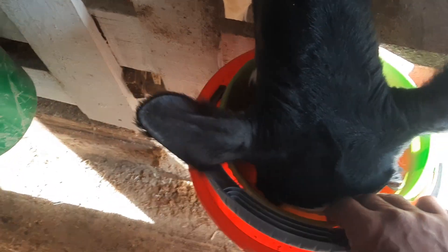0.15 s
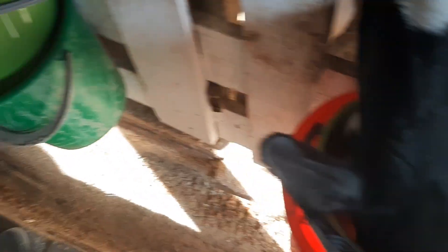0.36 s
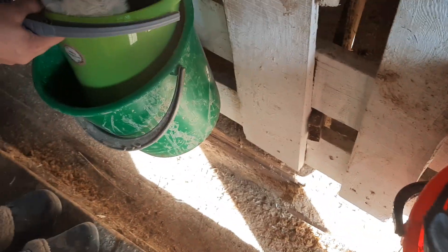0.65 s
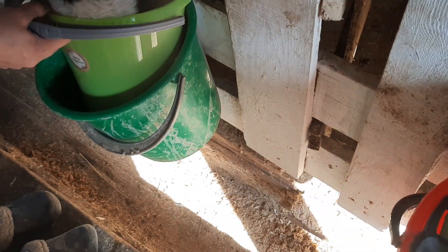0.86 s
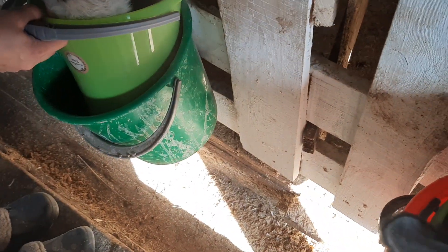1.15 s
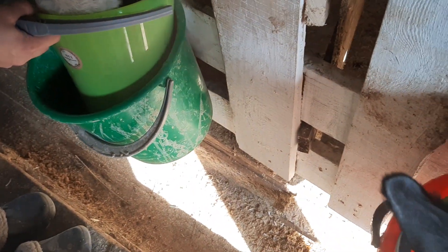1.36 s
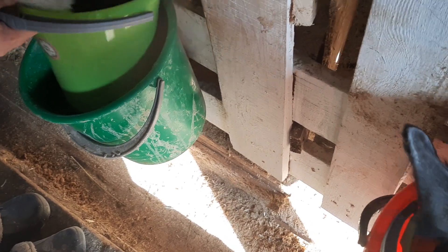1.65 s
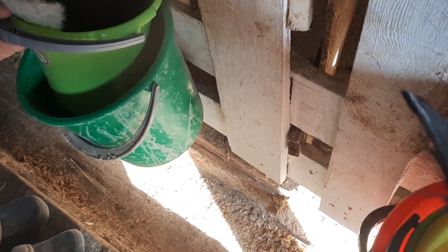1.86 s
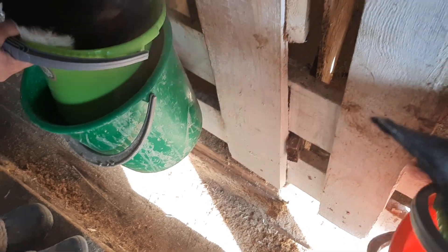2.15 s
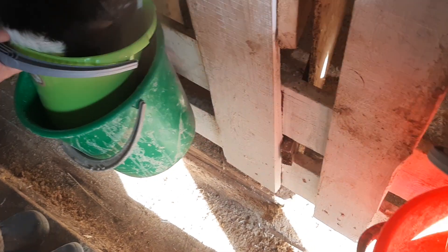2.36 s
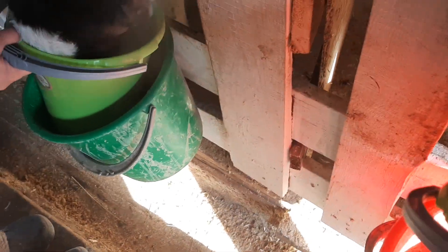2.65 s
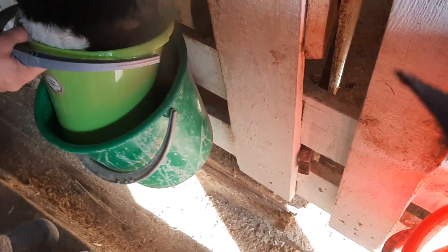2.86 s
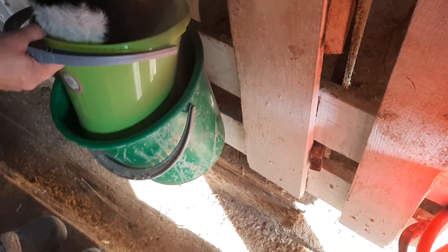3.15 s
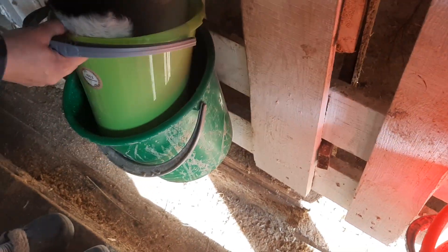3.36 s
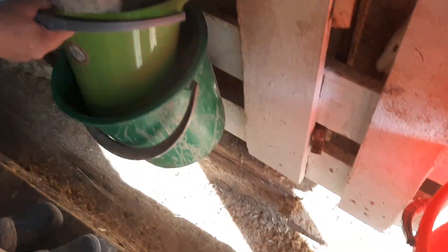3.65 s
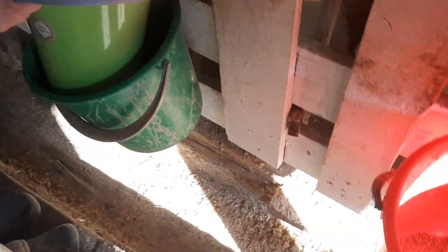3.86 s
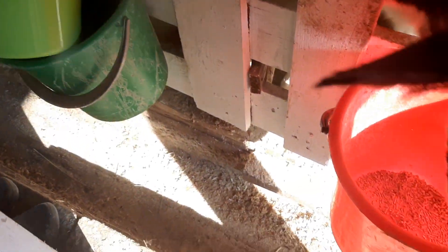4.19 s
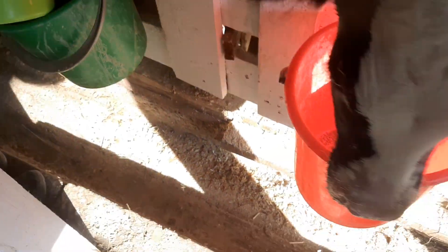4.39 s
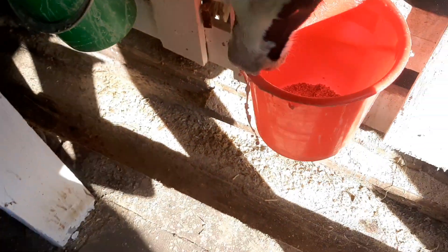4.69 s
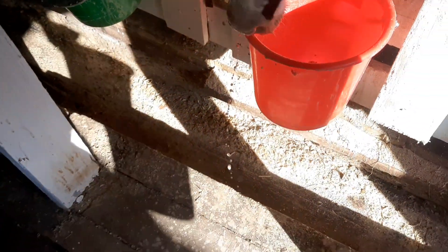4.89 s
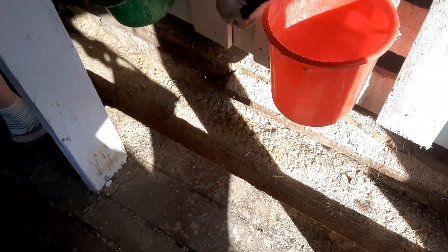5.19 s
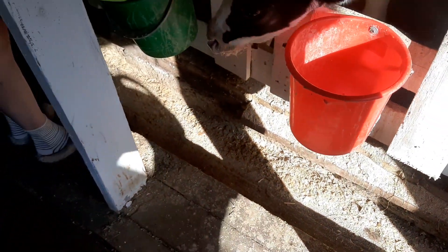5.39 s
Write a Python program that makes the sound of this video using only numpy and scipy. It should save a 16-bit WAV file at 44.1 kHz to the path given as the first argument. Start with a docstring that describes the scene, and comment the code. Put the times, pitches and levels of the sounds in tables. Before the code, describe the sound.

Calves feed from plastic buckets hung on a wooden pen, heard very close in stereo with a short barn tail. From 0 to 0.5 s muzzles bump the walls in low, hollow knocks, with crisp rim ticks, rubbing and scraping. From 0.6 to 1.5 s it is quieter: faint scrapes, small clicks, a soft nostril puff near 0.9. Knocks and rubs return around 1.5-2 s. At 2.2 s dry feed slides with a bright rustle, then several dull bumps lead to a strong, short, muffled thump at 2.6. Soft snuffles and scrapes follow until ticks at 3.6. At about 3.76 s a bucket slams the boards: two near-instant loud cracks, a rapid chatter and a woody ring, dying by about 4.2 among plastic ticks. The rest is sparse: light taps, weak bumps, rustles at 4.5 and 5.2, short snuffles, and a faint steady hiss to 5.5 s.

```python
"""Calves feeding from plastic buckets

Calves feed from buckets hung on a wooden pen in a barn, close to the microphone.
Muzzle bumps and plastic ticks are decaying modes with bursts of shaped noise; rubbing, scraping and
sliding feed are coloured showers of tiny grains; snuffles and pitched ticks are noise in a resonance.
Once a bucket is slammed against the boards. Stray pellets tap, and a faint steady hiss lies below.
The buckets colour the sounds made in and on them, and the barn gives the blows a short tail."""
import sys
import numpy as np
from scipy import signal
from scipy.fft import rfft, irfft, next_fast_len
from scipy.io import wavfile

SR = 44100
rng = np.random.default_rng(int(sys.argv[2]) if len(sys.argv) > 2 else 0)


def generate_wav(sig):
    """Save sig (samples, or channels by samples) to the path in sys.argv[1] as 16-bit PCM at SR."""
    pcm = np.round(np.clip(np.atleast_2d(sig).T, -1, 1) * 32767).astype(np.int16)
    wavfile.write(sys.argv[1], SR, pcm)


N = 243853  # length [samples]

# Event levels are relative, ahead of the mix trims. t60 is the time to fall by 60 dB.
# Muzzle bumps: (time [s], level [dB], settled pitch of the wall [Hz], t60 [s],
# hardness = upper ring and knock [dB], thud of the pen [dB])
BUMPS = [(0.016,-36.5,225.4,0.16,-5,-6), (0.166,-21.5,226,0.13,-18.5,-1.5), (0.191,-29,235,0.2,-9.5,6.5),
         (0.297,-25,227,0.21,-17.5,1.5), (0.769,-40.5,215.4,0.2,-17,-9), (0.867,-36.5,222.6,0.21,-23,-6.5),
         (1.105,-44,227,0.16,-2,-34), (1.115,-42.5,241,0.15,-8.5,-8.5), (1.24,-43.5,238,0.077,-21,-26),
         (1.31,-43,276,0.074,-15.5,-18), (1.491,-32,231.7,0.2,-19.5,-22), (1.55,-34,236,0.063,-18.5,-7),
         (1.6,-40.5,268,0.05,-3,-7), (1.636,-37.5,258,0.069,-16,1), (1.996,-33.5,228.2,0.28,-9,-11),
         (2.05,-39,236,0.21,-19,-4), (2.171,-38.5,215,0.13,-9,-30), (2.202,-32.5,306,.12,-13,-32),
         (2.249,-34,243.6,0.53,-10.5,-38), (2.304,-29,244.3,0.39,-7,-4), (2.353,-28,237.4,0.16,-14,-6),
         (2.409,-28,281,0.087,-15.5,-24), (2.614,-10.5,252,0.04,-21,-12.5), (2.64,-18,263.5,0.099,-33,-28),
         (2.861,-34.5,294,0.074,-21,-4), (3.014,-46.5,242,.1,-15,-15), (3.054,-45.5,272,0.087,-16,-7),
         (3.406,-34.5,280,0.091,-13.5,-3.5), (3.66,-28.5,347,0.045,-29,-6), (3.995,-34,171,0.085,-21.5,-20),
         (4.585,-49,295,0.09,-9.5,-11), (4.715,-41.5,250,0.1,-5,-14), (4.763,-38.5,248,0.033,-30,-18),
         (4.895,-44,273,0.096,-23,-33), (5.034,-53.5,303,0.075,-5,5)]
# Upper modes of a bucket: (frequency [Hz], level [dB], t60 [s])
BUCKET_MODES = [(369.4, 2.5, 0.15), (586, 2, 0.046), (720, 2, 0.32), (769, 0.5, 0.087), (1030, -4, 0.26),
                (1246, -4, 0.21), (1480, -4, 0.13), (1526, -32, 0.099), (1950, -27, 0.029),
                (2110, -18, 0.043)]
# Spectrum of a hard knock: (frequency [Hz], density [dB per Hz])
KNOCK_SPECTRUM = [(60, -43), (300, -14), (800, 7), (1500, -3.5), (2500, -8.5), (5000, -14), (16000, -44)]
# Spectrum of the pen's thud: (frequency [Hz], density [dB per Hz])
THUD_SPECTRUM = [(20, 1), (50, -35), (75, -1), (120, -3), (180, -4), (300, -7.5), (1000, -49), (16000, -90)]
# Overtone of the wall for a 0.1 s ring [dB], and its change per doubling of the ring [dB]
OVERTONE_DB, OVERTONE_DB_PER_DOUBLING = -18.5, -5.5

# Ticks of rims and handles: (time [s], crack level [dB], brightness [dB per octave], t60 [s])
TICKS = [(0.025,-53,10,0.056), (0.065,-43,-1,0.049), (0.109,-40,0.5,0.058), (0.19,-31.5,6,0.051),
         (0.201,-22.5,-2,0.076), (0.306,-28.5,0.5,.053), (0.343,-30,-2.5,0.12), (0.376,-29.5,-2,0.054),
         (0.4336,-39.5,0,0.042), (0.4725,-35,-3,0.093), (0.604,-39,-4,0.045), (0.619,-43,1,0.034),
         (0.896,-40,-3,0.11), (0.97,-45,-3.5,.025), (1.1145,-30.5,-2.5,0.0065), (1.21,-49,-2.5,.07),
         (1.585,-35,-2,0.13), (1.602,-27.5,-3,0.067), (1.8295,-35,-3,0.084), (2.206,-25,1,.05),
         (2.304,-28.5,-6,0.18), (2.398,-29.5,-2,0.044), (2.5595,-26,-2,0.07), (2.6119,-24,-6.5,0.03),
         (2.86,-35,-3,0.071), (2.887,-35,-1.5,0.091), (3.6191,-23.5,1,0.028), (3.799,-20,-3,0.025),
         (3.859,-26,-1,0.06), (3.933,-33.5,-2.5,0.086), (3.9677,-27,-1.5,0.05), (3.988,-31.5,9,0.07),
         (4.034,-32.5,5.5,0.049), (4.189,-43,0.5,0.13), (4.282,-43.5,-0.5,0.11), (4.378,-43.5,-4,0.071),
         (4.4767,-35,2,0.012), (4.704,-40,-2.5,0.026), (5.002,-39.5,12,0.068), (5.113,-34,4.5,0.05)]
# Crack of hard plastic: (frequency [Hz], density [dB per Hz])
SNAP_SPECTRUM = [(300, -6), (700, 0.5), (1500, 0.5), (3000, -3), (7000, -2), (11000, -7.5), (16000, -19)]
# Modes of a bucket's rim, under every tick: (frequency [Hz], level [dB], t60 [s])
RIM_MODES = [(772, -15, 0.27), (1494, 6.5, 0.051), (1600, -10, 0.091), (2005, -1, 0.073),
             (2437, 8.5, 0.027), (4930, 5, 0.035)]
RIM_DB = -10.5  # ring of the rim, relative to the crack level

# Blows of a bucket chattering on the boards: (time [s], level [dB], brightness [dB per octave])
SLAMS = [(3.7628, -11, 0.5), (3.768, -10.5, -4), (3.773, -30, 1), (3.786, -20, 7.5), (3.797, -21.5, 3),
         (3.811, -39, 16)]
# Noise-like dense ring of the boards: (frequency [Hz], density [dB per Hz], t60 [s])
BOARD_CRACK = [(30, -17, 0.58), (60, -18, 0.3), (123, -3, 0.35), (309, -8.5, 0.24), (623, 7, 0.069),
               (1170, -1, 0.18), (1800, -7, 0.086), (2220, -2.5, 0.053), (3700, -24, 0.17),
               (4670, -24.5, 0.19), (8500, -35.5, 0.13), (15900, -46.5, 0.071)]
# Modes of the pen boards with a bucket on them: (frequency [Hz], level [dB], t60 [s])
PEN_MODES = [(101, -13, .5), (146, -13, .3), (215, -11, .25), (251, 0, .35), (359, -7, .13), (388, -6, .2),
             (562, 0, .2), (619, -1, .24), (673, -2, .23), (727, -7, .2), (771, -9, .18), (841, -1, .16),
             (962, -8, .18), (1054, -11, .18), (1122, -6, .19), (1309, -8, .17), (1447, -10, .22),
             (1482, -11, .2), (1599, -14, .22), (1907, -16, .24), (2006, -12, .2), (2078, -16, .22),
             (2353, -17, .2), (4848, -19, .2), (4975, -20, .2)]

# Pitched ticks, short rings round one pitch: (time [s], level [dB], pitch [Hz])
PITCHED_TICKS = [(0.201,-30,2470), (0.527,-44.5,4060), (0.796,-43.5,1380), (1.319,-47.5,1640),
                 (1.585,-35,5000), (2.539,-38.5,4920), (2.614,-30.5,2500), (2.858,-39,3400),
                 (3.842,-35,4900), (3.919,-32.5,2720), (4.972,-48,5800)]
PITCHED_T60_S, PITCHED_Q, PITCHED_CRACK_DB = 0.035, 7.2, -11

# Strokes of a muzzle across a bucket:
# (peak time [s], length [s], scrape on the bottom [dB], rub on the wall [dB])
STROKES = [(0.02,0.24,-48,-56), (0.31,0.22,-43.5,-42.5), (0.63,.1,-52,-60), (0.84,0.24,-57.5,-56),
           (1.26,0.19,-65,-58), (1.61,0.19,-55,-49), (1.75,0.067,-54.5,-61), (1.99,0.15,-49.5,-50),
           (2.2,0.21,-52.5,-44), (2.36,0.17,-45,-44), (2.57,0.13,-45.5,-61), (2.89,0.14,-53,-51),
           (3.12,0.2,-53,-67), (3.28,0.12,-47,-51.5), (3.5,0.36,-51.5,-60), (3.68,.16,-45.5,-49),
           (3.94,0.19,-45.5,-48), (4.19,0.25,-53.5,-67), (4.41,0.074,-62,-59.5), (4.57,.12,-59,-63),
           (4.75,.1,-66,-58.5), (4.95,0.21,-79,-58.5), (5.18,0.15,-54.5,-80), (5.44,0.12,-49,-71)]
# Dry feed shoved aside and sliding down: (peak time [s], length [s], rustle [dB], fine fizz [dB])
SLIDES = [(0.14,.12,-65,-70), (0.53,.2,-62.5,-68), (0.86,0.13,-61,-77), (1.17,0.17,-70.5,-77),
          (1.56,0.23,-69,-71), (1.74,0.03,-61,-75), (1.93,0.042,-60.5,-68), (2.03,0.1,-52.5,-56),
          (2.225,.11,-41.5,-43), (2.34,0.094,-50,-60), (2.55,0.36,-58.5,-60), (2.72,.1,-63,-66),
          (2.84,0.16,-55.5,-57), (3.14,0.18,-60,-59.5), (3.29,0.28,-57.5,-60), (3.55,0.18,-57.5,-58),
          (4.08,0.056,-57,-72), (4.54,0.053,-55.5,-54.5), (4.64,0.08,-58.5,-63), (4.775,0.11,-58,-62.5),
          (5.04,0.11,-59,-62), (5.165,0.082,-55.5,-51), (5.49,0.11,-66,-75)]
# A stroke or slide: share of its length spent building, level at its ends, curve of its top
BUILD_SHARE, SWELL_EDGE_DB, SWELL_ROUNDNESS = 0.47, -7.5, 1.34
# Steady nosing under the strokes and slides: (time [s], level [dB])
NOSING = [(0.0, -55), (0.25, -53), (0.94, -60.5), (1.35, -66.5), (2.4, -47), (3.0, -61), (3.88, -52),
          (4.34, -57), (4.93, -56), (5.53, -55)]
# Each layer's part of the nosing [dB]
NOSING_RUB_DB, NOSING_SCRAPE_DB, NOSING_FEED_DB, NOSING_FIZZ_DB = -10, -4.5, -12.5, -18.5
# Muzzle rubbing the wall: (frequency [Hz], density [dB per Hz])
RUB_SPECTRUM = [(25, -21), (55, -13), (110, -15), (180, -7.5), (235, 0.5), (290, -6.5), (400, -16),
                (550, -45), (1200, -37), (16000, -81)]
# Muzzle scraping the bottom: (frequency [Hz], density [dB per Hz])
SCRAPE_SPECTRUM = [(100, -32), (300, -2.5), (480, 4.5), (800, 3), (1200, 0), (1500, -1), (1800, -5),
                   (2300, -6.5), (3200, -17.5), (6000, -29), (16000, -30)]
# Rustle of sliding feed: (frequency [Hz], density [dB per Hz])
FEED_SPECTRUM = [(300, -41), (1500, -2.5), (2800, -1.5), (4000, 1.5), (5000, -0.5), (7000, -0.5),
                 (9000, -13), (12000, -30), (16000, -26)]
# Fine fizz of sliding feed: (frequency [Hz], density [dB per Hz])
FIZZ_SPECTRUM = [(1000, -73), (6000, -40), (9000, -8), (11000, 1.5), (16000, 0)]

# Snuffles into the feed; each lasts 1.5 times its nominal length:
# (peak time [s], nominal length [s], level [dB], resonance [Hz], hiss beside it [dB])
SNUFFS = [(0.896,0.072,-54,1110,-7), (1.796,0.042,-51.5,583,-26), (2.823,0.12,-54,1840,4.5),
          (3.285,0.055,-53.5,736,-6), (3.35,0.23,-58,1000,-12), (3.722,0.079,-52,900,0),
          (4.228,0.25,-55.5,1006,-9), (4.533,0.061,-51.5,660,-8), (4.766,.06,-54.5,990,4.5),
          (5.176,0.077,-52,910,6), (5.424,0.076,-54.5,890,-11), (5.49,0.12,-57.5,1900,-14)]
# Air through wet nostrils: (frequency [Hz], density [dB per Hz])
SNUFF_SPECTRUM = [(100, -27), (400, 5), (900, 5), (2200, 1), (4000, 1.5), (7000, 0.5), (11000, -12),
                  (16000, -8)]

PELLETS_PER_S, PELLETS_DB, PELLET_T60_S = 14, -20, 0.018  # mean rate; level relative to the nosing

# Quiet of the barn and the microphone's own hiss: (frequency [Hz], density [dB per Hz])
QUIET_SPECTRUM = [(30, 9), (250, 7), (800, -3), (3000, -7), (7000, -23), (11000, -40), (16000, 4)]
QUIET_DB = -72

# Resonances of the air and walls of a bucket: (frequency [Hz], width [Hz], boost [dB])
HOLLOW = [(700, 19, 1.5), (823, 60, 3.5), (1000, 28, 0), (1442, 25, 4.5), (1544, 28, 8.5), (2015, 59, 6.5),
          (2270, 34, 6), (2410, 38, 5), (2850, 370, 4), (4780, 390, 2.5)]
# Reverberation of the barn: (frequency [Hz], t60 [s], relative level [dB])
BARN = [(60, 0.66, -3.5), (252, 0.32, -28), (690, 0.35, -13), (1980, 0.3, -10), (6000, 0.27, -7),
        (15900, 0.26, -9)]
# Likeness of left and right: (frequency [Hz], correlation [0-1])
ALIKE = [(20, 0.83), (250, 1), (450, 0.97), (750, 0.4), (1500, 0.02), (4000, 0), (16000, 0.1)]
# Colour of the microphone: (frequency [Hz], gain [dB])
MIC = [(20, -16), (45, 2), (7000, 1.5), (7700, -2), (8300, -12.5), (9300, -7.5), (10500, 0.5), (16000, 1.5)]
EDGE_HZ = 16200  # upper band limit


def amp(db):
    """Decibels to gain."""
    return 10 ** (np.asarray(db) / 20)


def evened(x):
    """Scales to rms 1 over both channels."""
    return x / np.sqrt(np.mean(x ** 2) + 1e-20)


def read(table, hz, axis=1):
    """Reads one column of a table, joined on a log-frequency axis."""
    columns = np.transpose(table)
    return np.interp(np.log(hz + 1), np.log(columns[0] + 1), columns[axis])


def seconds(length):
    """A time axis of the given length [s]."""
    return np.arange(int(length * SR)) / SR


def add(mix, s, sound):
    """Adds a sound into the mix at a time [s]."""
    part = mix[..., max(round(s * SR), 0):][..., :sound.shape[-1]]
    part += sound[..., :part.shape[-1]]


def colour(x, spectrum):
    """Filters by a (frequency [Hz], gain [dB]) spectrum."""
    size = next_fast_len(x.shape[-1])
    gain = amp(read(spectrum, np.fft.rfftfreq(size, 1 / SR)))
    return irfft(rfft(x, size) * gain, size)[..., :x.shape[-1]]


def fade_bands(x, gain_db):
    """Applies gain_db(Hz, s) to the short-time spectrum, so each band can die at its own rate."""
    hz, t, z = signal.stft(x, SR, nperseg=256)
    faded = z * amp(gain_db(hz[:, None], t))
    return signal.istft(faded, SR, nperseg=256)[1][..., :x.shape[-1]]


def hiss(t):
    """White noise, unrelated on two channels."""
    return rng.standard_normal((2, len(t)))


def ring(modes, t, detune):
    """Dying modes, each with a random sign per channel."""
    hz, db, t60 = np.transpose(modes)[:, :, None]
    shift = rng.standard_normal((len(modes), 1))
    signs = rng.choice([-1., 1.], (2, len(modes)))
    pitch = hz * (1 + detune * shift)
    waves = amp(db - 60 * t / t60) * np.sin(2 * np.pi * pitch * t)
    return signs @ waves / np.linalg.norm(amp(db))


def grains(per_s, spread_db):
    """Tiny impulses of random size at random moments, shared by both channels."""
    happens = rng.random(N) < per_s / SR
    size = amp(spread_db * np.minimum(rng.exponential(1, N), 4)) * happens
    return rng.standard_normal((2, N)) * size


def resonant(t, hz, q):
    """Noise of rms 1 in one resonance, filtered twice for steep skirts."""
    b, a = signal.iirpeak(hz, max(q, 1), SR)
    noise = rng.standard_normal((2, len(t) + SR // 20))
    once = signal.lfilter(b, a, noise)
    return evened(signal.lfilter(b, a, once)[:, -len(t):])  # the filter's start-up is left out


def bumps():
    """A soft muzzle sets the bucket wall swinging; harder contact wakes its upper modes; the pen thuds."""
    out, t = np.zeros((2, N)), seconds(.45)
    bend = 1 + 0.046 * np.exp(-t / 0.016)  # the wall is stiffer while it is pressed
    for s, db, hz, t60, hard_db, thud_db in BUMPS:
        # a lingering push also starts more slowly and has less overtone
        swell = 1 - np.exp(-t / (0.0018 * (t60 / 0.098) ** 0.68))
        over_db = OVERTONE_DB + OVERTONE_DB_PER_DOUBLING * np.log2(10 * t60)
        angle = 2 * np.pi * np.cumsum(hz * bend) / SR
        waves = np.exp(1j * angle) + amp(over_db) * np.exp(1.75j * angle)
        swing = waves * swell * amp(-60 * t / t60)
        wall = np.array([swing.real, swing.imag])  # a quarter cycle apart on the two channels
        upper = amp(2.5) * ring(BUCKET_MODES, t, detune=.01)
        knock = amp(-1) * evened(colour(hiss(t), KNOCK_SPECTRUM)) * amp(-60 * t / 0.22)
        thud = .5 * evened(colour(hiss(t), THUD_SPECTRUM)) * swell * amp(-60 * t / 0.24)
        bump = amp(2.5) * wall + amp(hard_db) * (upper + knock) + amp(thud_db) * thud
        add(out, s, amp(db) * bump)
    return out


def ticks():
    """Hard plastic snaps: a sharp crack with a random uneven colour, and a short ring of the rim."""
    out, t = np.zeros((2, N)), seconds(.15)
    bands = np.geomspace(300, 16000, num=36)
    for s, db, tilt_db, t60 in TICKS:
        ripple_db = 4.4 * rng.standard_normal(len(bands))
        shape = tilt_db * np.log2(bands / 3000) + read(SNAP_SPECTRUM, bands) + ripple_db
        envelope = amp(-60 * t / t60) + 0.16 * np.exp(-t / 0.00056)  # a decay with a brief sharper edge
        crack = evened(colour(hiss(t), np.c_[bands, shape])) * envelope
        rim = ring(RIM_MODES, t, detune=0.019)
        add(out, s, amp(db) * (crack + amp(RIM_DB) * rim))
    return out


def slam():
    """Several quick blows ring the boards of the pen; treble and bass die at their own rates."""
    out, t = np.zeros((2, N)), seconds(.7)
    for s, db, tilt_db in SLAMS:
        def crack_db(hz, age):
            """Level of the crack by frequency and age."""
            tilt = tilt_db * np.log2((hz + 100) / 800)
            return read(BOARD_CRACK, hz) + tilt - 60 * age / read(BOARD_CRACK, hz, axis=2)

        crack = fade_bands(hiss(t), crack_db)
        crack /= np.sqrt(np.mean(crack[:, :SR // 100] ** 2))  # rms 1 over the first 10 ms
        add(out, s, amp(db - 6.0) * crack)
    s, db, _ = max(SLAMS, key=lambda blow: blow[1])  # the heaviest blow bends the whole board
    add(out, s, amp(db - 2.5) * ring(PEN_MODES, t, detune=0))
    high_pass = signal.butter(2, 90, "high", fs=SR, output="sos")
    return signal.sosfilt(high_pass, out)  # keeps deep bass out of the slam


def pitched_ticks():
    """Pitched ticks: a small crack and a short ring round one pitch, made of resonant noise."""
    out, t = np.zeros((2, N)), seconds(.15)
    for s, db, hz in PITCHED_TICKS:
        crack = amp(PITCHED_CRACK_DB) * evened(colour(hiss(t), SNAP_SPECTRUM))
        tick = resonant(t, hz, PITCHED_Q) + crack
        add(out, s, amp(db - 60 * t / PITCHED_T60_S) * tick)
    return out


def nosing():
    """The strength of the steady nosing, as a gain for every sample."""
    return amp(np.interp(np.arange(N) / SR, *np.transpose(NOSING)))


def swells(events, steady_db, axis):
    """Gain of one layer: each event builds and dies away, on top of the steady nosing."""
    t, columns = np.arange(0, N / SR, .002), np.transpose(events)[:, :, None]
    age = (t - columns[0]) / columns[1]
    away = np.maximum(-age / BUILD_SHARE, age / (1 - BUILD_SHARE))  # 0 at the peak, 1 at the ends
    level_db = columns[axis] + SWELL_EDGE_DB * abs(away) ** SWELL_ROUNDNESS
    power = (amp(level_db) ** 2).sum(0)
    return np.sqrt(np.interp(np.arange(N) / SR, t, power) + (amp(steady_db) * nosing()) ** 2)


def rubbing():
    """Muzzles stick and slip on the bucket walls: many small grains, low in pitch."""
    rub = evened(colour(grains(1200, 0.73), RUB_SPECTRUM))
    return amp(1.0) * swells(STROKES, NOSING_RUB_DB, axis=3) * rub


def scraping():
    """Muzzles stick and slip across the bucket bottoms: denser grains in the middle range."""
    scrape = evened(colour(grains(3000, 0.76), SCRAPE_SPECTRUM))
    return amp(-1.5) * swells(STROKES, NOSING_SCRAPE_DB, axis=2) * scrape


def sliding_feed():
    """Dry feed slides in the buckets: dense uneven grains make a rustle and a finer fizz."""
    rustle = evened(colour(grains(6000, 1.7), FEED_SPECTRUM))
    fizz = evened(colour(grains(9000, 3.0), FIZZ_SPECTRUM))
    rustle_gain = swells(SLIDES, NOSING_FEED_DB, axis=2)
    fizz_gain = swells(SLIDES, NOSING_FIZZ_DB, axis=3)
    return amp(3.0) * (rustle_gain * rustle + fizz_gain * fizz)


def snuffs():
    """A calf blows through its nostrils: a swell of air in one resonance, with hiss."""
    out = np.zeros((2, N))
    for s, length, db, hz, hiss_db in SNUFFS:
        t = seconds(1.5 * length)
        swell = np.sin(np.pi * (t / t[-1]) ** 1.4) ** 2  # builds slowly, stops sooner
        narrowness = 1.55 * (length / 0.094) ** 2.5  # long, gentle blows come nearer to a whistle
        breath = amp(hiss_db) * evened(colour(hiss(t), SNUFF_SPECTRUM))
        air = resonant(t, hz, narrowness) + breath
        add(out, s - t[np.argmax(swell)], amp(db) * swell * air)
    return out


def pellets():
    """Stray pellets tap the plastic at random in short noise bursts, louder while the calves are busy."""
    t = seconds(0.083)
    burst = hiss(t) * amp(-60 * t / PELLET_T60_S)
    taps = signal.oaconvolve(grains(PELLETS_PER_S, 0.67), burst, axes=1)[:, :N]
    return amp(PELLETS_DB) * nosing() * evened(colour(taps, SNAP_SPECTRUM))


def quiet():
    """A faint steady background of coloured noise."""
    return amp(QUIET_DB) * evened(colour(rng.standard_normal((2, N)), QUIET_SPECTRUM))


def hollow(x):
    """The bucket lifts its own resonances above the direct sound."""
    lifted = x.copy()
    for hz, width, db in HOLLOW:
        b, a = signal.iirpeak(hz, hz / width, SR)
        lifted += signal.lfilter(b, a, x) * (amp(db) - 1)
    return amp(-2) * lifted


def barn(x):
    """A short diffuse tail from the boards and floor: sparse random echoes, each band dying by itself."""
    t = seconds(0.87)
    present = (rng.random((2, len(t))) < .06) * (t > .005)
    taps = rng.choice([-1., 1.], (2, len(t))) * present
    tail = fade_bands(taps, lambda hz, age: read(BARN, hz, axis=2) - 60 * age / read(BARN, hz))
    tail /= np.linalg.norm(taps[0] * amp(-60 * t / .5))  # energy of a plain 0.5 s tail as reference
    return signal.fftconvolve(x, tail, axes=1)[:, :N]


def ports(x):
    """Two spaced ports share most of the bass but little treble; the left hears later and softer."""
    size = next_fast_len(N + SR // 20)
    hz = np.fft.rfftfreq(size, 1 / SR)
    other, right = rfft(x, size)
    alike = read(ALIKE, hz)
    blend = alike * right + np.sqrt(1 - alike ** 2) * other
    left = blend * np.exp(-2j * np.pi * hz * 0.00024)  # 0.24 ms late
    return irfft(np.array([amp(-2.5) * left, amp(2.5) * right]), size)[:, :N]


def scene():
    """Blows ring in the barn over the small sounds of feeding."""
    blows = hollow(amp(1.0) * bumps() + amp(-5.5) * ticks() + pitched_ticks()) + slam()
    feeding = rubbing() + scraping() + sliding_feed()
    small_sounds = hollow(feeding + snuffs() + pellets())
    return ports(blows + barn(blows) + small_sounds + quiet())


def record(dry):
    """The microphone has a hollow in its treble and clips at full scale; then the band limit."""
    heard = np.clip(colour(dry, MIC), -1, 1)
    low_pass = signal.firwin(511, EDGE_HZ, window=("kaiser", 9), fs=SR)
    return signal.oaconvolve(heard, low_pass[None], "same")


dry = scene()
out = record(dry)
generate_wav(out)
```